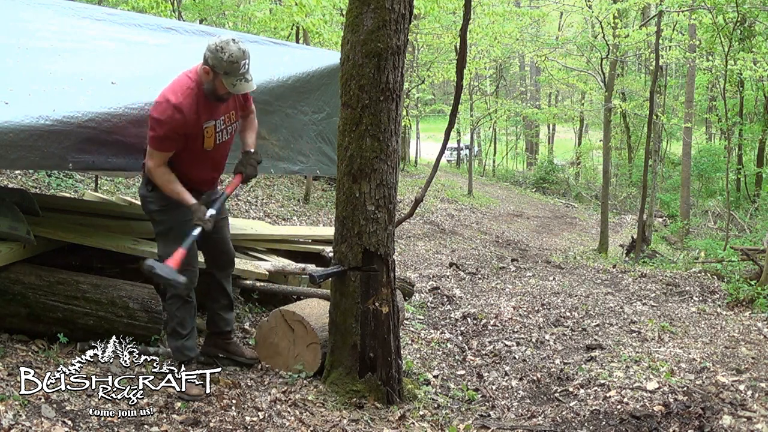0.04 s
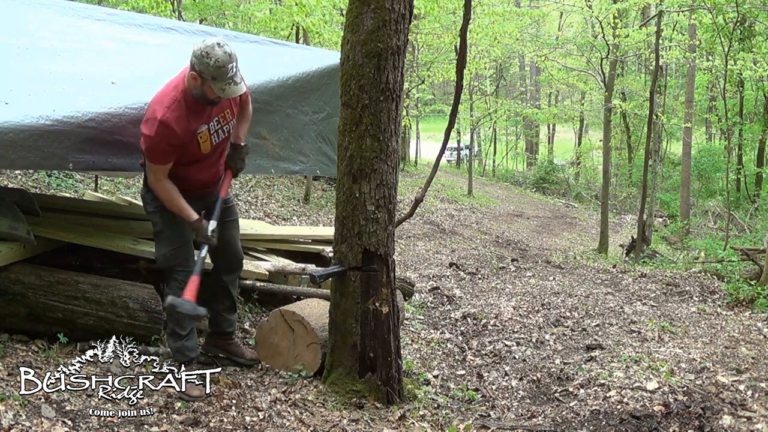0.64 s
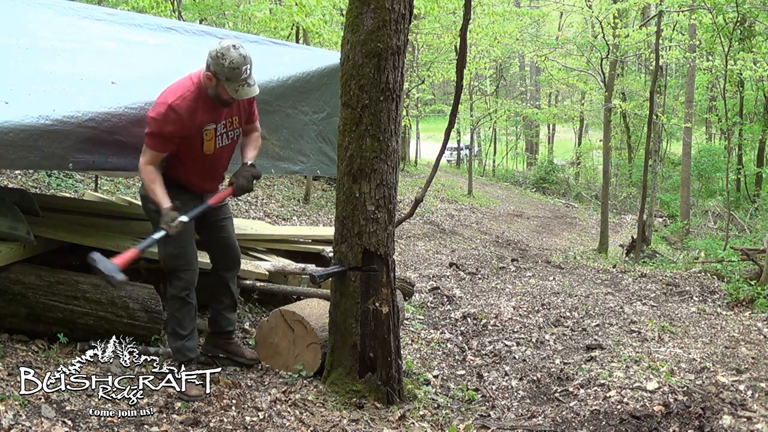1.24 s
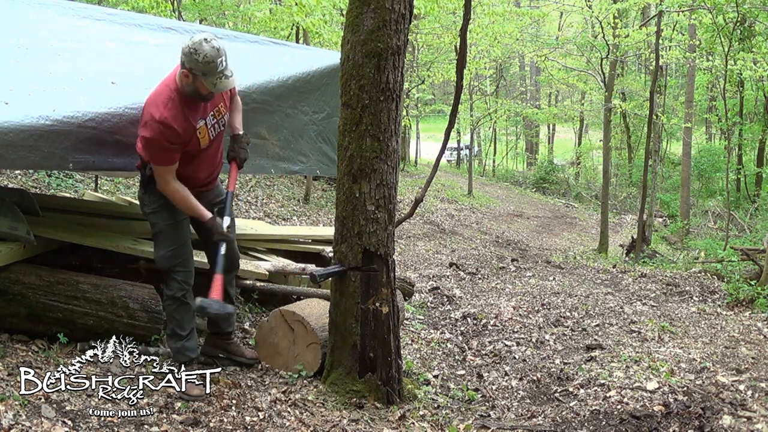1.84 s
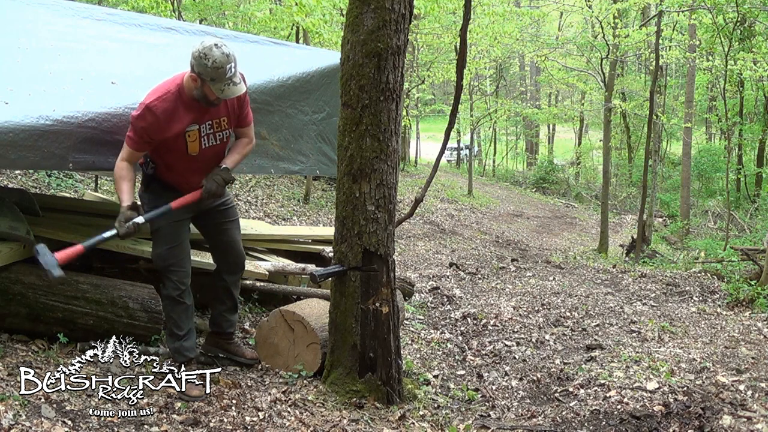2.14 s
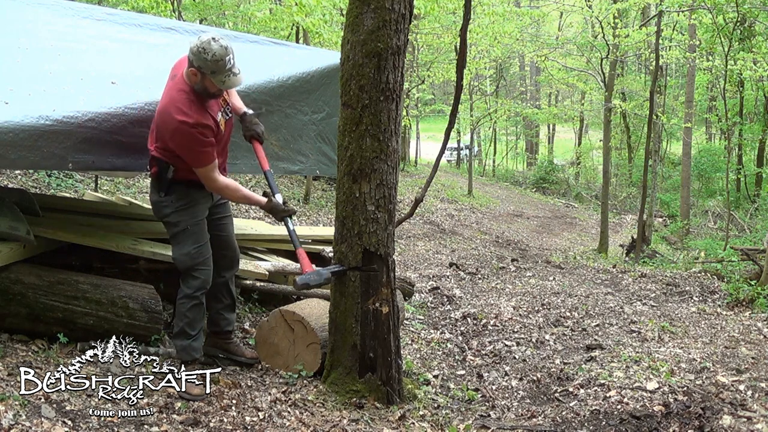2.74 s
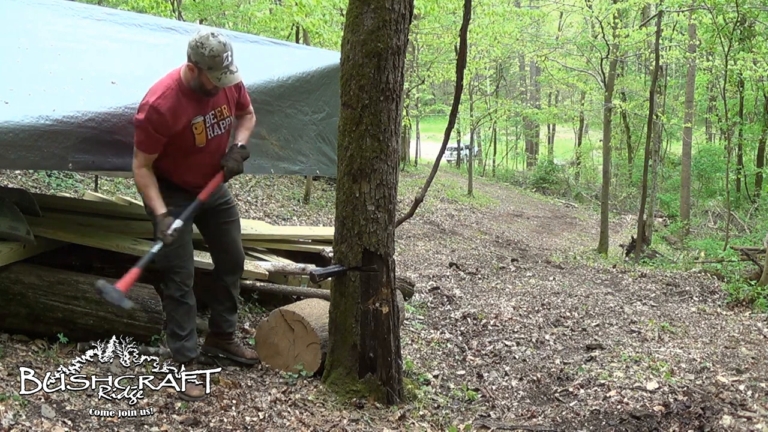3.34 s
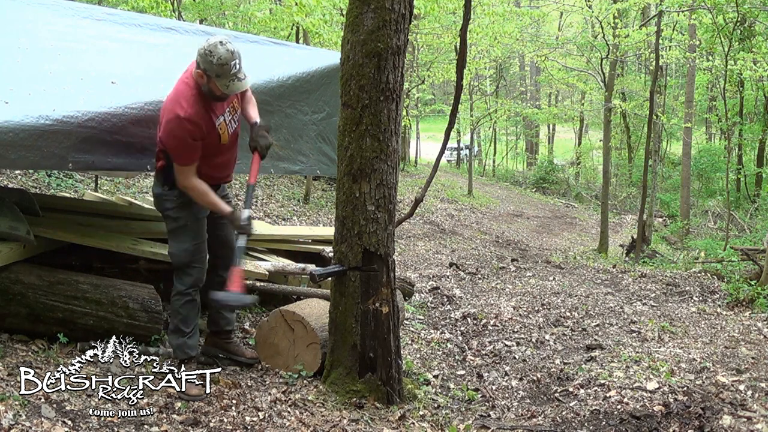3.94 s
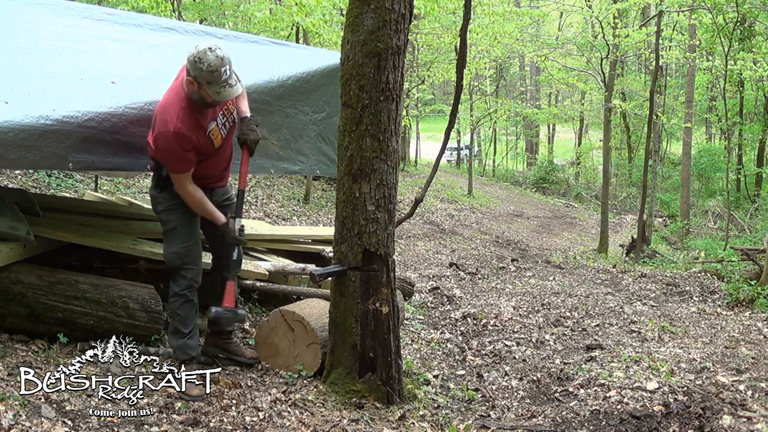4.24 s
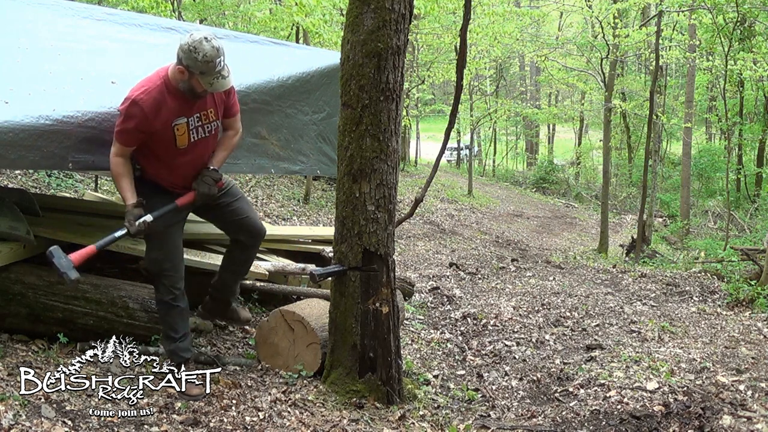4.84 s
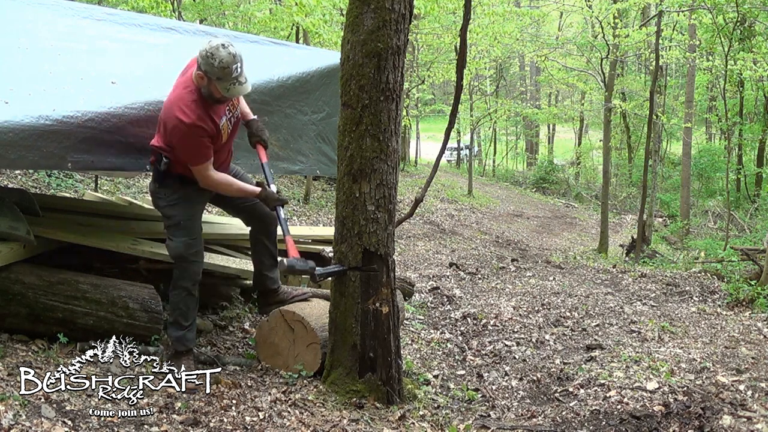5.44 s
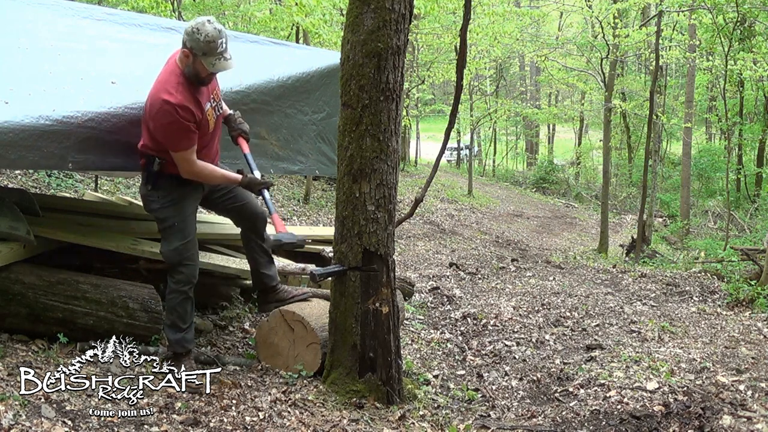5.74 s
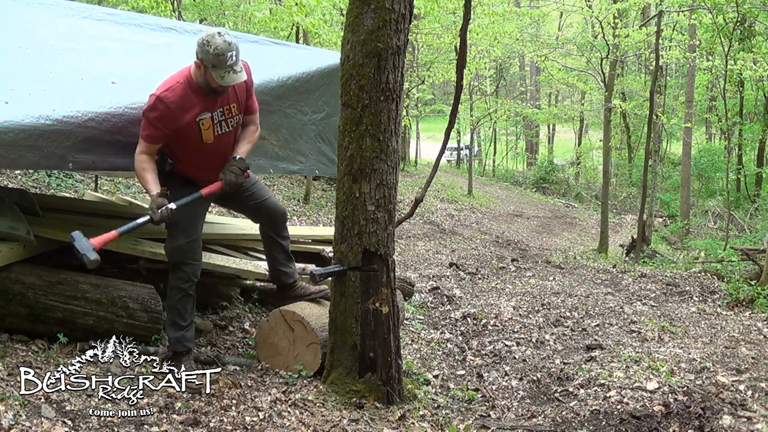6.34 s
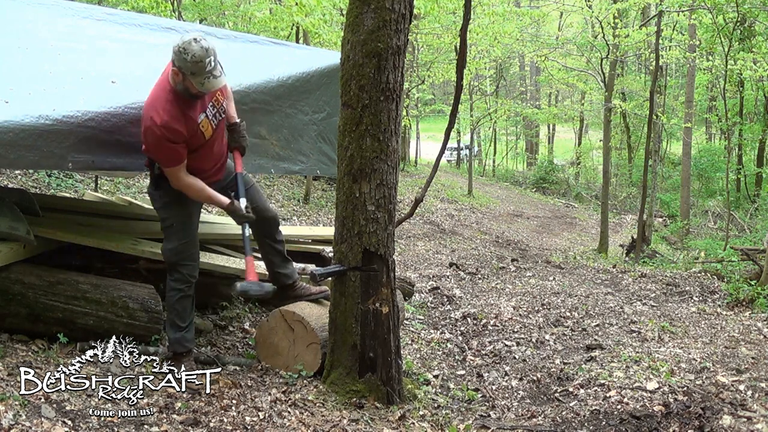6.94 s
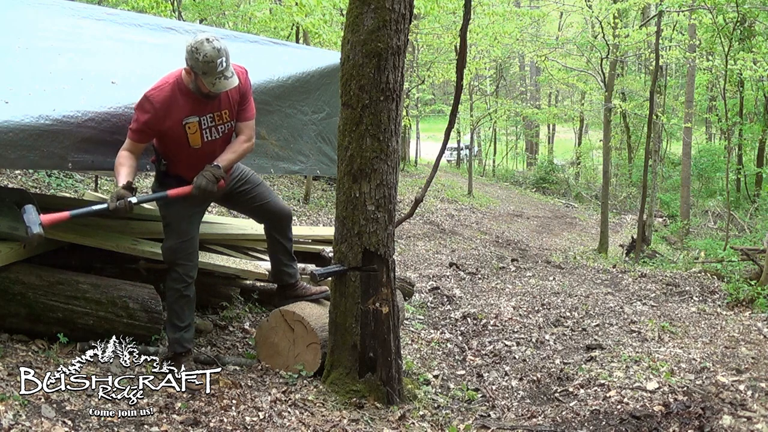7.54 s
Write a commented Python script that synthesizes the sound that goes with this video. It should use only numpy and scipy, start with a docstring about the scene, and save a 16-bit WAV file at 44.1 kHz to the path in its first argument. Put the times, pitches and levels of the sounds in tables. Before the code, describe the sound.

A sledgehammer drives a steel wedge into a tree trunk with six sharp, echoing blows in a quiet forest.

```python
"""Six sledgehammer blows crack out as a steel wedge is driven into a standing trunk.
Each impact excites the modes of wood and steel, and the forest answers with reverberation.
Between blows boots shift in dry leaves, twigs snap, birds whistle far off and a low rumble passes.
A camcorder with a faint whine picks up the scene and limits the peaks."""
import sys
import numpy as np
from scipy import signal
from scipy.fft import rfft, irfft, next_fast_len
from scipy.io import wavfile
from scipy.ndimage import uniform_filter1d, minimum_filter1d, map_coordinates

SR = 44100
rng = np.random.default_rng(int(sys.argv[2]) if len(sys.argv) > 2 else 0)


def output_pcm(signal):
    """Save a mono or channel-first signal as 16-bit PCM at the path in sys.argv[1].

    Samples are clipped to [-1, 1] before scaling.
    """
    pcm = np.clip(np.atleast_2d(signal).T, -1, 1) * 32767
    wavfile.write(sys.argv[1], SR, np.round(pcm).astype(np.int16))


N = 334278
TIME = np.arange(N) / SR

# Hammer blows, with relative levels: start_s, wood_db, thump_db, treble_db, steel_db, sideways_db,
# forest_db, bite_db, chatter_hz, slab_hz, slab_db, middle_hz, splinter_hz
BLOWS = [(0.3275, -2.5, -11, 11, 1.5, -7, -5.5, 2.5, 312.6, 591, 15, 1100, 1650),
         (1.5343, -2.5, -6.5, 4, -17, 7, 2.5, 5.5, 1130, 500, 4.5, 1175, 2070),
         (2.7813, -0.5, -1.5, 1, -10.5, -1, -0.5, 0, 1130, 430, 7.5, 847, 2230),
         (4.1188, 2.5, -4, -6, -27, -5, -6, 8.5, 1026, 505, 11, 980, 1880),
         (5.52, -1, -3, 2, -0.5, 1.5, 5, 0, 1020, 432, 7.5, 970, 1790),
         (6.7928, -2.5, -3, 0.5, 3, 2, 5.5, 3.5, 1078, 432, 9.5, 990, 1800)]
# Spectrum of the crack as heard, cut off steeply above 13 kHz: frequency_hz, density_db
CRACK_SPECTRUM = [(20, -9.5), (70, -7), (170, -3), (300, -4), (600, -2.5), (1400, -2), (2400, -4),
                  (3200, -7), (5500, -14), (8500, -23), (10000, -23.5), (13200, -26.5), (14500, -61)]
# Spectrum of the trunk's thump: frequency_hz, density_db
THUMP_SPECTRUM = [(15, -26), (35, -6), (50, -27), (70, -8.5), (105, -13), (180, -3), (235, -6.5), (280, 1),
                  (325, -4), (375, 2.5), (460, -28.5), (800, -19.5), (3000, -77)]
# Modes of wedge and hammer head: pitch_hz, level_db, width_hz, t60_s, sideways_share
STEEL_MODES = [(6850, -13, 300, .45, 0), (7415, 0, 140, .54, 0), (8231, -6, 50, .42, 0),
               (8725, -1.5, 85, .42, 1), (11400, -12, 130, .33, 1), (12600, -5, 80, .36, 0)]
# Knocks of the bouncing hammer: start_s, peak_db, pitch_hz
REBOUNDS = [(1.561, -10.5, 2160), (1.604, -6.5, 665), (5.622, -25, 1300), (5.634, -23, 1100),
            (6.867, -20, 1910)]
# Reverberation of nearby trunks and woodpile: frequency_hz, t60_s
NEAR_DECAY = [(60, 0.8), (300, 0.61), (1000, 0.68), (3000, 0.67), (7000, 0.57), (13000, 0.5)]
# Reverberation of the deep forest: frequency_hz, t60_s
FAR_DECAY = [(60, 0.74), (200, 2.25), (450, 2.18), (1000, 2.62), (2000, 2.15), (4000, 1.52), (8000, 0.56),
             (14000, .35)]
# Boots and clothing shifting in the leaves: peak_s, level_db, rise_s, release_s
SHUFFLES = [(.25, -54.5, .5, 0.19), (2.5, -55, 0.52, 1), (3.8, -64.5, .4, 0.32), (4.74, -43.5, 0.097, 0.11),
            (5.183, -46.5, 0.0071, 0.027), (5.498, -33.5, 0.033, 0.049), (5.85, -51, 0.46, 0.9),
            (6.47, -57.5, 0.23, 0.36)]
# Spectrum of dry leaves: frequency_hz, density_db
LEAF_SPECTRUM = [(120, -47), (200, -1), (440, -9.5), (500, -5), (836, -6), (1370, -7.5), (2650, -5.5),
                 (4770, -8.5), (9580, -14), (16000, -15.5)]
# Snapping twigs and bark: start_s, peak_db, pitch_hz
TWIG_SNAPS = [(0.146, -32, 4840), (1.034, -46, 900), (2.121, -25.5, 7400), (2.1375, -30, 5500),
              (3.793, -32.5, 10000), (4.73, -24, 9900), (4.899, -25.5, 4150), (5.2536, -18.5, 3800),
              (5.418, -32, 1470), (6.162, -34.5, 9050), (6.179, -30, 1315), (6.713, -28.5, 10400),
              (7.128, -23.5, 6050), (7.385, -21.5, 10900)]
# One bird's long whistles: start_s, pitch_hz, level_db
WHISTLES = [(0.129, 3014, -33), (2.425, 3010, -38.5)]
# Another bird's quick slurs: start_s, length_s, lowest_hz, turn_fraction, level_db
SLURS = [(1.29, 0.046, 2710, 0.43, -48.5), (1.352, 0.038, 2190, 1, -46), (4.05, 0.066, 2360, 0.55, -49.5),
         (6.659, 0.044, 2770, .36, -42.5), (6.728, 0.055, 2410, 1, -44)]
# Spectrum of the still forest: frequency_hz, density_db
AIR_SPECTRUM = [(12, -8), (20, -10), (84, -4), (118, -2), (143, -4), (270, -6), (377, -6.5), (457, -1),
                (571, -7.5), (841, -8), (1780, -11.5), (2770, -14), (5380, -19), (15000, -24.5)]
# Likeness of left and right in a diffuse field: frequency_hz, coherence_ratio
COHERENCE = [(60, 1), (250, 0.91), (600, 0.76), (1200, 0.59), (4000, 0.74), (8000, 0.96), (13000, 1)]
# Phase difference between the microphone ports: frequency_hz, phase_rad
PORT_PHASE = [(0, 0), (260, 0.41), (520, 0.46), (2070, 0.44), (5340, 0.7), (8180, 0.2), (16500, 0)]


def blows():
    """Impact excitation: each blow drives wood, trunk and steel; harder ringing deepens the chatter."""
    out, t = np.zeros((2, N)), np.arange(2 * SR) / SR
    for (s, wood_db, thump_db, treble_db, steel_db, sideways_db, forest_db, bite_db,
         chatter_hz, slab_hz, slab_db, middle_hz, splinter_hz) in BLOWS:
        resonances = [(slab_hz, slab_db, 0.33),  # pitch_hz, boost_db, width in log frequency
                      (middle_hz, 7, 0.24),
                      (splinter_hz, 5.5 + 0.24 * treble_db, 0.17)]
        colour_db, far_colour_db = crack_spectra(resonances, treble_db, 5 * amp(steel_db), chatter_hz)
        add(out, s, amp(wood_db) * wood_crack(t[:SR // 8], colour_db, bite_db))
        add(out, s, amp(wood_db + forest_db) * forest_echo(t, colour_db, far_colour_db))
        add(out, s, amp(thump_db) * trunk_thump(t[:SR // 2]))
        add(out, s, amp(steel_db) * steel_ring(t[:SR // 2], treble_db, sideways_db))
    for s, db, pitch_hz in REBOUNDS:
        add(out, s, amp(db) * knock(pitch_hz, t60=0.07, echo_db=-40, echo_t60=0.31, slope_db=13))
    return out


def crack_spectra(resonances, treble_db, chatter_db, chatter_hz):
    """Resonance and interference colour the crack: two curves in dB, close by and far off."""
    grid = np.linspace(0, SR / 2, 2048)
    peaks = sum(db * np.exp(-(np.log((grid + 1) / hz) / width) ** 2) for hz, db, width in resonances)
    # the slab's many small modes shift with every blow
    ripple = 2 * wobble(grid / 70) * along([(300, 0.69), (1500, 0.74)], grid)
    # a hammer face that touches twice in quick succession combs the spectrum
    comb_depth = chatter_db * along([(400, 0.17), (2600, 0.47), (5500, 0.94), (9000, 0.21)], grid)
    comb = comb_depth * np.cos(2 * np.pi * grid / chatter_hz)
    tilt = treble_db * along([(1800, 0.021), (5000, 1)], grid)
    colour = along(CRACK_SPECTRUM, grid) + peaks + ripple + comb + tilt
    # the lower notes carry furthest
    carried = colour + 0.31 * peaks * along([(1200, 0.83), (2000, 0)], grid)
    return lambda hz: np.interp(hz, grid, colour), lambda hz: np.interp(hz, grid, carried)


def wood_crack(t, colour_db, bite_db):
    """Fracture: the edge bites the fibres, the wood cracks, and the slab's slower bending follows."""
    def burst(tilt):
        return noise(len(t), lambda hz: colour_db(hz) + along(tilt, hz))
    split = burst([(200, -12), (600, -3.5)])
    crack = (1.1 * split.mean(0) + 0.09 * split) * fade(t, 0.11)
    bite = burst([(600, -30.5), (1800, 4), (6000, -6.5)]).mean(0) * fade(t, 0.032)
    flex = burst([(200, -20), (450, 3), (800, 2), (1600, -35)]) * np.exp(-((t - 0.011) / 0.0041) ** 2)
    return amp(-1) * (crack + flex) + amp(bite_db) * bite


def trunk_thump(t, swell_s=0.016, thump_db=-14):
    """Growth and decay: a low thump swells to its peak about 30 ms after the crack, then dies away."""
    envelope = (t / swell_s) ** 2 * np.exp(-t / swell_s)
    low = noise(len(t), lambda hz: along(THUMP_SPECTRUM, hz)) * envelope
    return amp(thump_db) * unit(low) * np.sqrt(np.mean(envelope ** 2)) / envelope.max()


def steel_ring(t, treble_db, sideways_db, ring_db=-41, stereo_spread=0.23):
    """Damped modes: the steel rings, and echoes smear each mode into a narrow band."""
    ring = np.zeros((2, len(t)))
    for hz, db, width_hz, t60, sideways_share in STEEL_MODES:
        phase = 2 * np.pi * hz * t
        mid, side = [wobble(t * width_hz) * np.sin(phase) + wobble(t * width_hz) * np.cos(phase)
                     for _ in range(2)]
        band = np.array([mid + stereo_spread * side, mid - stereo_spread * side])
        # a dull blow excites the top modes less, an off-centre blow the sideways ones
        excitation_db = 0.092 * treble_db * np.log2(hz / 7000) + sideways_share * sideways_db
        ring += amp(db + excitation_db) * unit(band * fade(t, t60))
    return amp(ring_db) * ring


def forest_echo(t, colour_db, far_colour_db, near_db=-8, far_db=-26):
    """Reverberation: reflections of the crack build up and decay, those from far trees more slowly."""
    near = damped(noise(len(t), colour_db), NEAR_DECAY) * (1 - np.exp(-t / 0.02))
    far = damped(noise(len(t), far_colour_db), FAR_DECAY) * (1 - np.exp(-t / 0.036))
    clumps = amp(0.89 * wobble(t * 70))  # single trunks return the echo unevenly
    return clumps * (amp(near_db) * near + amp(far_db) * far)


def knock(pitch_hz, t60, echo_db, echo_t60, slope_db):
    """A brief transient has a broad spectrum: a noise burst around one pitch with its echo, peak 1."""
    def colour_db(hz):
        return -slope_db * np.abs(np.log((hz + 1) / pitch_hz)) + along([(11000, -3), (15000, -3.5)], hz)
    t = np.arange(SR // 4) / SR
    burst = noise(len(t), colour_db) * (fade(t, t60) + amp(echo_db) * fade(t, echo_t60))
    return burst / np.abs(burst).max()


def underfoot(grain_rate_hz=700, crackle_db=-69):
    """Brittle fracture: dry leaves crunch in tiny grains, the litter crackles and twigs snap."""
    grains = unit(amp(3.5 * wobble(TIME * grain_rate_hz)))
    sheen = [(7000, 0), (10500, 6.5), (13500, -8)]
    leaves = unit(noise(N, lambda hz: along(LEAF_SPECTRUM, hz) + along(sheen, hz)))
    shuffles = [amp(db) * surge(s, rise_s, release_s) for s, db, rise_s, release_s in SHUFFLES]
    out = np.linalg.norm(shuffles, axis=0) * grains * leaves
    litter = noise(N, lambda hz: along([(5000, -19), (9000, -5.5), (10800, -7), (14000, -19)], hz))
    out += amp(crackle_db) * unit(litter * amp(11 * wobble(TIME * 300)))
    for s, db, pitch_hz in TWIG_SNAPS:
        add(out, s, amp(db) * knock(pitch_hz, t60=0.0048, echo_db=-36, echo_t60=0.12, slope_db=18.5))
    return out


def stalks(ticks_per_s=14, level_db=-44.5, spread_db=3.5, pitch_hz=10000):
    """Random impulses: trodden leaf stalks tick independently of one another."""
    out, count = np.zeros((2, N)), round(ticks_per_s * N / SR)
    for place, size, detune in zip(rng.random(count), *rng.standard_normal((count, 2)).T):
        tick = knock(pitch_hz * np.exp(0.12 * detune), t60=0.0025, echo_db=-38, echo_t60=0.12, slope_db=28)
        add(out, place * N / SR, amp(level_db + spread_db * size) * tick)
    return out


def bird(notes, direct_db, echo_db, quaver):
    """Frequency modulation: pure notes quaver along their contours, and the trees scatter them."""
    song = np.zeros(N)
    waver = 1 + quaver * wobble(TIME * 300)
    for s, hz, db in notes:
        level = amp(np.interp(TIME, s, db)) * (TIME > s[0]) * (TIME < s[-1])
        phase = 2 * np.pi * np.cumsum(waver * np.interp(TIME, s, hz)) / SR
        song += uniform_filter1d(level, size=200) * np.sqrt(2) * np.sin(phase)
    return amp(direct_db) * song + amp(echo_db) * scatter(song, t60=0.64)


def whistle(s, pitch_hz, db, rise_s=0.06, fall_s=0.025, sag_hz_per_s=2400, edge_db=22.5):
    """Linear glide: a note swells and stops as it sags. Gives time_s, pitch_hz, level_db."""
    t = np.array([-rise_s, 0, fall_s])
    return s + rise_s + t, pitch_hz - sag_hz_per_s * t, db - edge_db * (t != 0)


def slur(s, length_s, lowest_hz, turn, db, swoop_hz=1820):
    """Parabolic glide: a note swoops to its lowest pitch at the turn. Gives time_s, pitch_hz, level_db."""
    progress = np.linspace(0, 1, 20)
    swoop = (progress - turn) ** 2
    return s + progress * length_s, lowest_hz + swoop_hz * swoop / swoop.max(), np.full_like(progress, db)


def scatter(x, t60):
    """Scattering by many trunks: convolution with a decaying noise tail of unit energy."""
    t = np.arange(SR // 2) / SR
    echoes = noise(len(t)) * fade(t, t60)
    return signal.fftconvolve(x[None], echoes / np.linalg.norm(echoes[0]), axes=1)[:, :len(x)]


def rumble(peak_s=6.2, level_db=-53):
    """Amplitude modulation: low noise swells once, softly, between the last two blows."""
    low = noise(N, lambda hz: along([(25, -8), (90, 1.5), (180, -4), (400, -5), (1500, -53)], hz))
    return amp(level_db) * surge(peak_s, rise_s=0.19, release_s=0.58) * unit(low)


def forest_hush(level_db=-55):
    """Ambient noise: the still forest sets a steady broadband floor."""
    tilt = [(1900, -1.5), (2750, -1), (4500, 0.5)]
    return amp(level_db) * unit(noise(N, lambda hz: along(AIR_SPECTRUM, hz) + along(tilt, hz)))


def camera_noise(whine_hz=15734, whine_db=-62, tick_hz=2750, tick_db=-55, ticks_per_s=29.97):
    """Self-noise: the camera adds a thin pure tone and faint periodic ticks of uneven strength."""
    whine = amp(whine_db) * np.sin(2 * np.pi * whine_hz * TIME)
    cycle = (TIME * ticks_per_s + 0.44) % 1
    ticks = np.exp(-((cycle - 0.5) / 0.11) ** 2) * np.sin(2 * np.pi * tick_hz * TIME)
    return whine + amp(tick_db + 2.5 * wobble(TIME * ticks_per_s)) * ticks


def noise(n, colour_db=lambda hz: 0):
    """Diffuse field: coloured noise from all around is partly coherent at two close ports."""
    def response(hz):
        angle = np.arccos(np.clip(along(COHERENCE, hz), 0, 1)) / 2
        return amp(colour_db(hz)) * np.array([np.cos(angle), np.sin(angle)])
    mid, side = filtered(rng.standard_normal((2, n)), response)
    return np.array([mid + side, mid - side])


def damped(x, decays):
    """Frequency-dependent damping: each band of x dies at its own rate."""
    hz, t, spectra = signal.stft(x, SR, nperseg=256)
    spectra = spectra * fade(t, along(decays, hz)[:, None])
    return signal.istft(spectra, SR, nperseg=256)[1][:, :x.shape[-1]]


def filtered(x, response):
    """Linear filtering: the spectrum of x times a frequency response."""
    n = x.shape[-1]
    padded = next_fast_len(n + SR // 8)
    return irfft(rfft(x, padded) * response(np.fft.rfftfreq(padded, 1 / SR)), padded)[..., :n]


def fade(t, t60):
    """Exponential decay, 60 dB down at t60."""
    return np.exp(-np.log(1000) * t / t60)


def surge(peak_s, rise_s, release_s):
    """Exponential growth to 1 at peak_s, then exponential decay."""
    return np.exp(-np.maximum((peak_s - TIME) / rise_s, (TIME - peak_s) / release_s))


def wobble(x):
    """Smooth random fluctuation with one knot per unit of x."""
    return map_coordinates(rng.standard_normal(int(x.max()) + 4), [x])


def along(points, hz):
    """Interpolation of (frequency_hz, value) points on a logarithmic frequency axis."""
    knots_hz, values = np.transpose(points)
    return np.interp(np.log(hz + 1), np.log(knots_hz + 1), values)


def amp(db):
    """Decibels as an amplitude ratio."""
    return 10 ** (np.asarray(db) / 20)


def unit(x):
    """Normalisation to rms 1."""
    return x / np.sqrt(np.mean(x ** 2) + 1e-20)


def add(track, s, x):
    """Superposition of x on the track from time s."""
    part = track[:, max(round(s * SR), 0):][:, :x.shape[-1]]
    part += x[..., :part.shape[-1]]


def scene():
    """Superposition: the pressures of all sources add."""
    whistles = bird([whistle(*row) for row in WHISTLES], direct_db=-2, echo_db=0, quaver=0.022)
    slurs = bird([slur(*row) for row in SLURS], direct_db=-8, echo_db=-7.5, quaver=0.0195)
    return blows() + underfoot() + whistles + slurs + rumble() + forest_hush() + camera_noise() + stalks()


def record(dry, ceiling_db=-5, cutoff_hz=16300):
    """Transduction: the ports differ in phase, a limiter holds the peaks and a low-pass ends the band."""
    ports = filtered(dry, lambda hz: np.exp(0.5j * along(PORT_PHASE, hz) * np.array([[1], [-1]])))
    needed_gain = np.minimum(1, amp(ceiling_db) / (np.abs(ports).max(0) + 1e-9))
    gain = uniform_filter1d(minimum_filter1d(needed_gain, size=120), size=60)
    return filtered(ports * gain, lambda hz: hz < cutoff_hz)


dry = scene()
out = record(dry)
output_pcm(out)
```